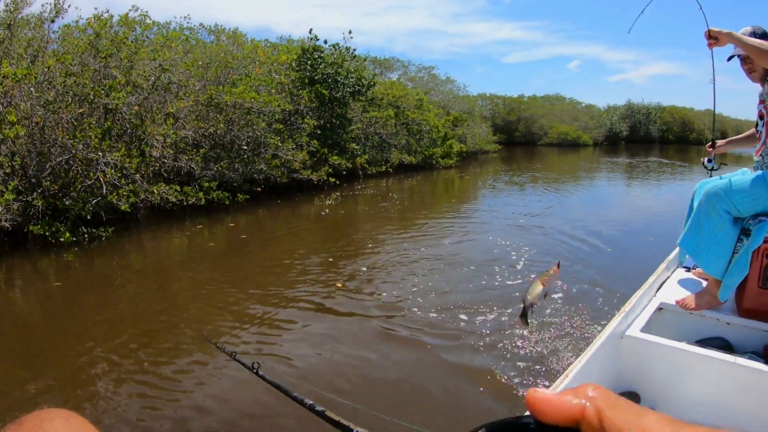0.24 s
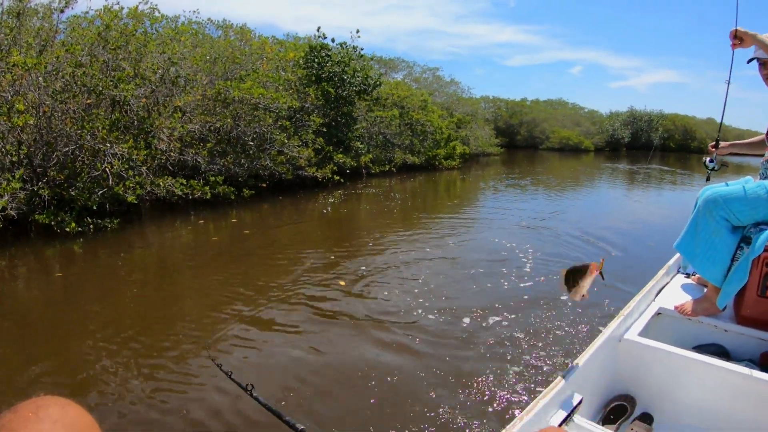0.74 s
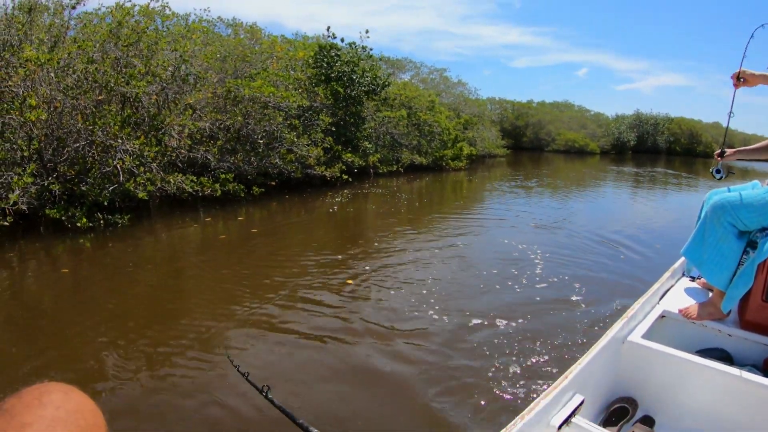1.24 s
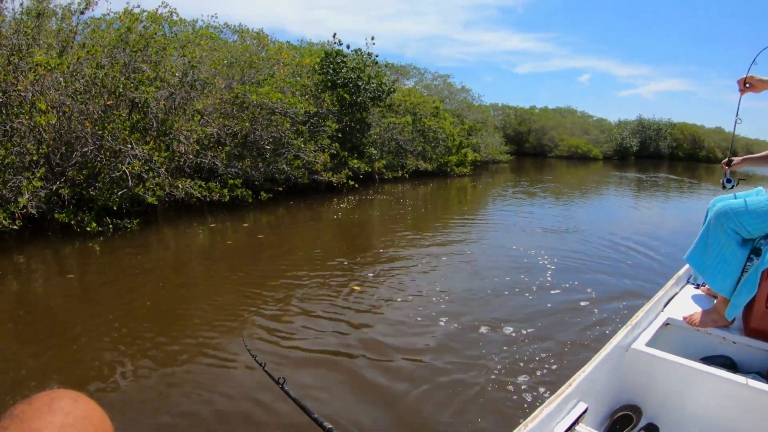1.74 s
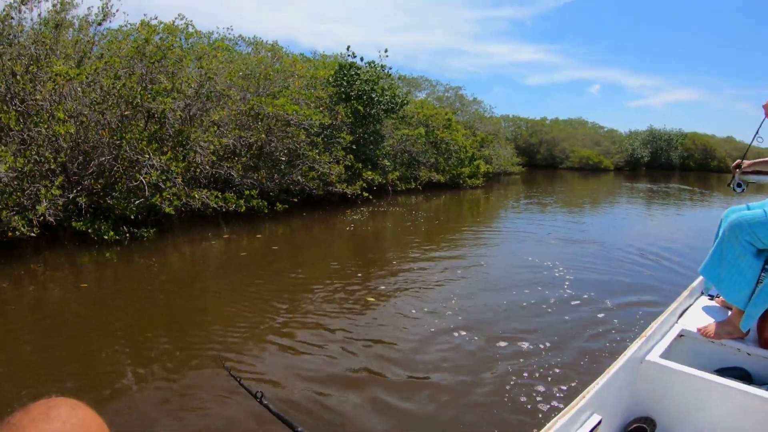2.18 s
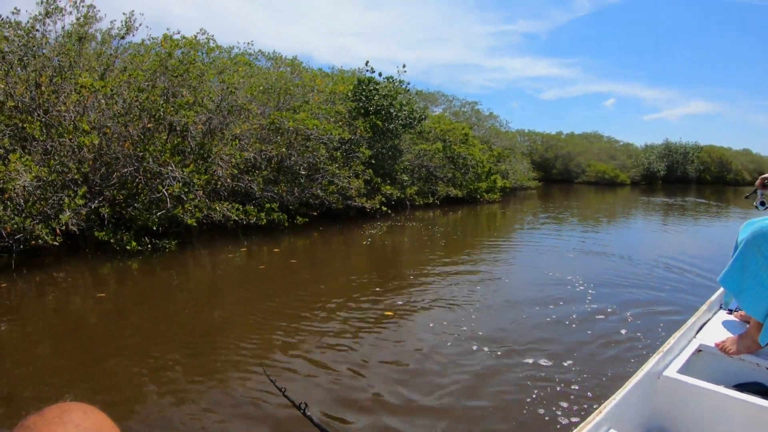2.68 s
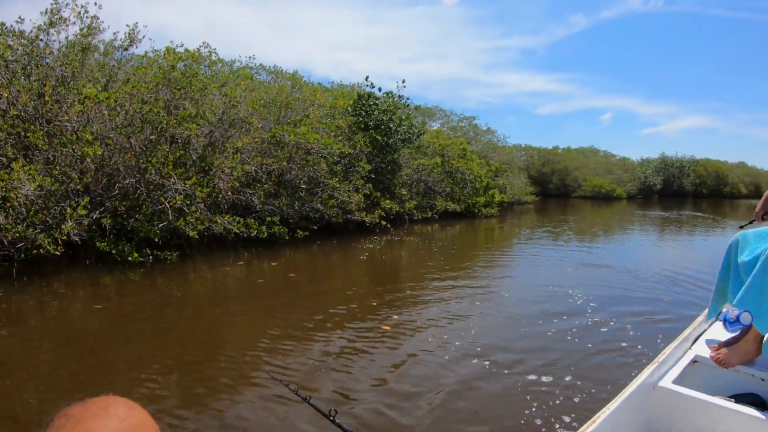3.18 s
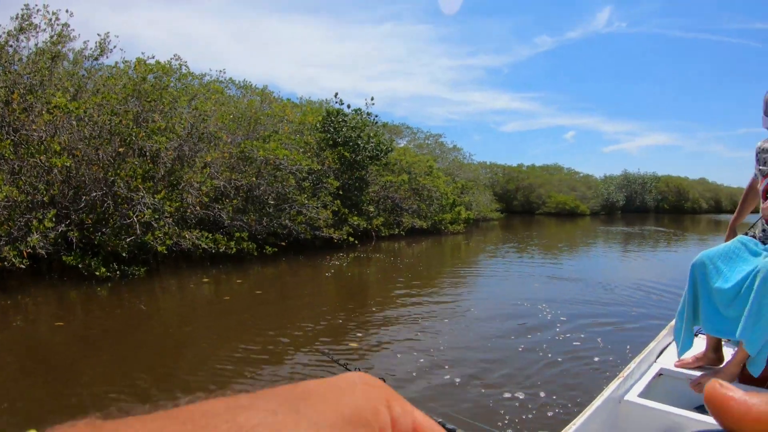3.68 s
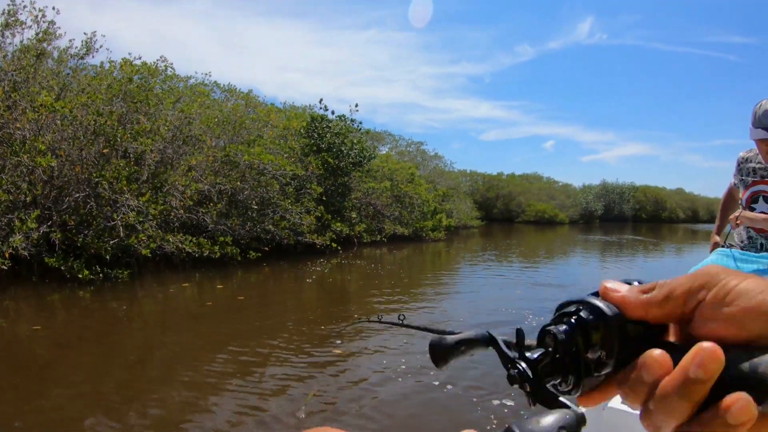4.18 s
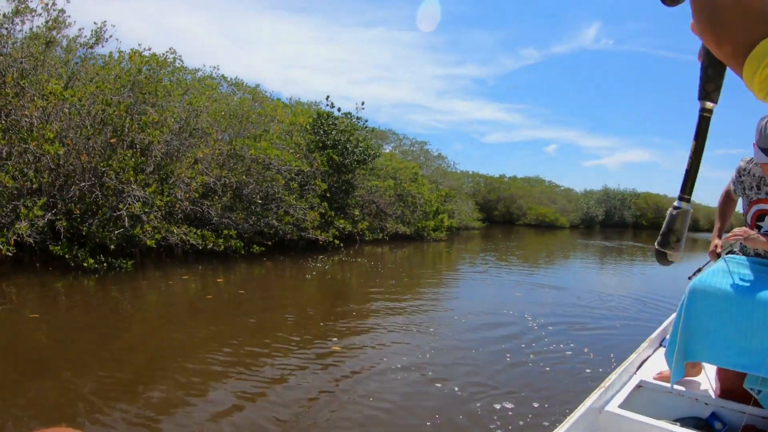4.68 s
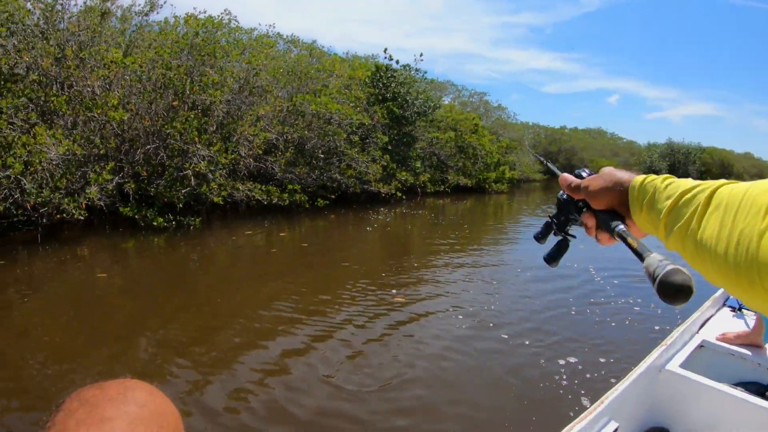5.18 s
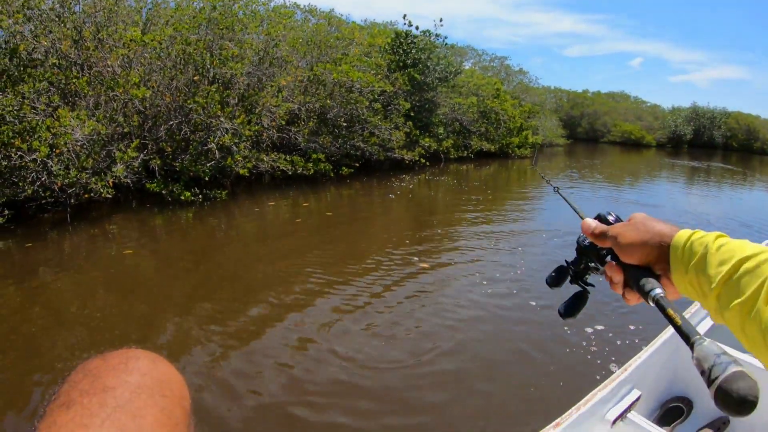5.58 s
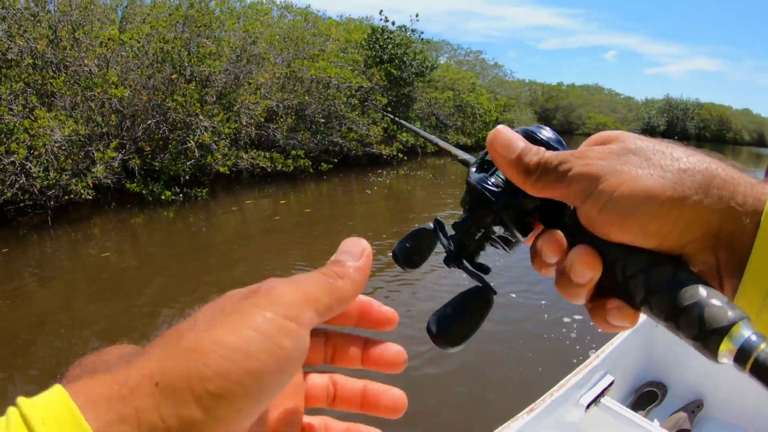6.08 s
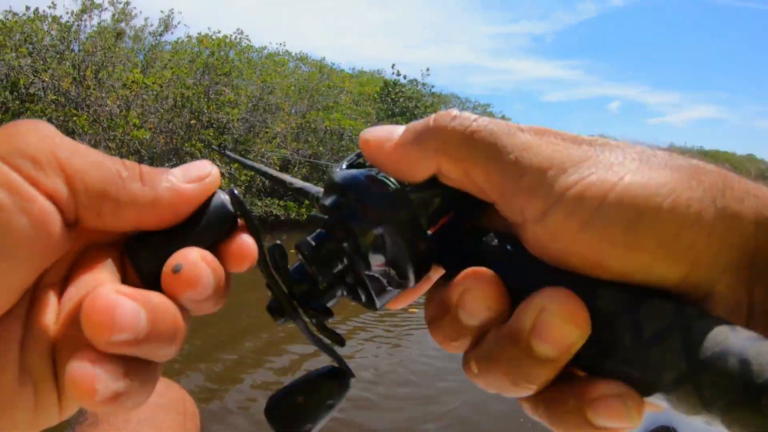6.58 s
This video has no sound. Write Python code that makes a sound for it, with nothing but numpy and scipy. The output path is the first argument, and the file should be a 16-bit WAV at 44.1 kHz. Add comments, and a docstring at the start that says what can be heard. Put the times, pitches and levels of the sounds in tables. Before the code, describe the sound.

Heard from inside a small boat on a river, light splashing and drips give way to a fish hitting the deck. Its flopping builds into loud hollow thumps, wet smacks and clanks, then dies down. A nearby reel snaps open, a rod sweeps the air, line whistles out faintly, and sharp clicks lead into a soft whirr of gears. Gentle water and a low rumbling hum continue throughout.

```python
"""A slosh and a patter of drops: a hooked fish leaves the river. It lands in a small boat and thrashes,
booming the hollow hull, slapping the deck with wet skin and jolting a loose fitting into a clank.
Close by, an angler frees a reel's spool, swishes the rod, lets the line whistle out and clicks the reel
back into gear. A low hum and rumble, lapping water and a soft outdoor hiss lie under it all."""
import sys
import numpy as np
from scipy import signal
from scipy.fft import rfft, irfft, next_fast_len
from scipy.io import wavfile
from scipy.ndimage import uniform_filter1d, map_coordinates

SR = 44100
rng = np.random.default_rng(int(sys.argv[2]) if len(sys.argv) > 2 else 0)


def dump(signal):
    """Clip the signal to [-1, 1] and save it as 16-bit WAV at the path in sys.argv[1]."""
    limited = np.clip(np.atleast_2d(signal).T, -1, 1)
    pcm = np.round(limited * 32767).astype(np.int16)
    wavfile.write(sys.argv[1], SR, pcm)


N = 301203
T = np.arange(N) / SR
AGE = T[:SR // 2]  # seconds since a contact


# The fish hits the hull. Each row: start in seconds, boom in dB, knock in dB, share of the free ring
# time, floor drum in dB.
BLOWS = [(1.108, -15.5, -30, 0.69, -33), (1.121, -24.5, -29.5, 0.74, -32), (1.222, -31.5, -50, 0.29, -66),
         (1.381, -39.5, -43, .69, -56), (2.665, -32, -51, 1, -39), (2.955, -7, -10.5, 0.71, -19.5),
         (2.964, -23, -36, 0.31, -33), (2.986, -17.5, -30, 0.61, -42), (3.256, -18, -22, 0.58, -21),
         (3.265, -18, -22.5, 0.99, -29), (3.645, -33, -38, 1, -32), (3.816, -30.5, -31, 0.96, -36.5),
         (3.942, -36.5, -41.5, .42, -40)]
# The hollow hull's modes. Each row: pitch in Hz, relative level in dB, t60 in seconds.
HULL_MODES = [(196.5, -3.5, 0.15), (255, -1, 0.15), (295, 1, .05), (456, -10, 0.047), (518.6, -1.5, 0.074),
              (637, -8.5, .13), (674.3, -8, 0.11), (690, -0.5, 0.025), (781, -12.5, 0.037),
              (996, -39, 0.11), (1158, -24.5, 0.089), (1361, -23.5, 0.064)]

def hull():
    """Hard blows ring the hull and drum its floor; the fish's weight damps them when it stays down."""
    out = np.zeros(N)
    drum_hz, drum_t60 = 109, 0.35
    for s, boom_db, knock_db, ring_share, drum_db in BLOWS:
        rise = 0.00097 * 2 ** (-knock_db / 28)  # the attack doubles for a knock 28 dB softer
        add(out, s, strike(HULL_MODES, 430, boom_db, knock_db, rise, ring_share))
        drum = np.sin(2 * np.pi * drum_hz * AGE) * fade(drum_t60 * ring_share, rise=0.011)
        add(out, s, amp(drum_db) * crest(drum))
    return out


# The soft body flops on the deck; hands and feet bump about.
# Each row: start in seconds, relative level in dB, panel pitch in Hz, attack in seconds.
THUDS = [(0.477, -43, 113, 0.0046), (1.074, -31.5, 257, 0.0025), (1.1, -19, 290, .005),
         (1.145, -24.5, 209, .0025), (1.193, -27.5, 255.6, 0.0033), (1.241, -36, 284, 0.0069),
         (1.317, -35, 253, 0.0022), (1.901, -24, 185, 0.0026), (2.672, -20, 179.5, 0.0076),
         (2.913, -16.5, 153, 0.01), (3.412, -20.5, 155, 0.015), (3.458, -25.5, 128.5, 0.0091),
         (3.539, -23, 160, 0.0021), (3.643, -15, 164.3, .0027), (3.668, -22, 153.5, 0.013),
         (3.793, -23, 136.7, 0.009), (3.827, -20, 132, 0.0025), (3.864, -28.5, 107, 0.0066),
         (3.937, -25, 149.4, .009), (3.968, -26.5, 132, 0.0097), (4.204, -42, 80, .005),
         (5.006, -25, 135, 0.0056), (5.796, -36, 97.6, 0.0088), (6.452, -32, 132, .017)]

def thuds():
    """A soft push moves one panel: a short low note in a dull puff."""
    out = np.zeros(N)
    for s, db, hz, rise in THUDS:
        panel = crest(np.sin(2 * np.pi * hz * AGE) * fade(0.13, rise))
        puff = spatter([(hz / 3, -18), (hz, 0), (hz * 2, -7), (hz * 6, -28)], 0.11, rise)
        add(out, s, amp(db - 5.5) * (panel + 0.28 * puff))
    return out


# Tail and fin slaps, and first a drip landing on the boat at 0.479 s. Each row: start in seconds, relative
# spray and smack levels in dB, t60 in seconds.
SLAPS = [(0.479, -52, -55.5, 0.22), (1.0558, -39, -40.5, 0.1), (1.1054, -33.5, -26, 0.11),
         (1.5975, -49, -45.5, 0.12), (1.7778, -39.5, -40.5, 0.1), (1.8948, -43.5, -49, 0.063),
         (2.2707, -37.5, -36, 0.11), (2.625, -49.5, -38, 0.3), (2.6632, -29.5, -28.5, 0.049),
         (2.8275, -38.5, -25.5, 0.065), (2.8641, -38, -26.5, 0.16), (2.9246, -40, -33, .2),
         (2.9514, -29, -22, 0.055), (2.9915, -45.5, -39, .11), (3.056, -45, -46, 0.078),
         (3.1205, -35.5, -32, 0.048), (3.259, -37.5, -28, .093), (3.3052, -49, -35, 0.062),
         (3.4228, -40, -36.5, 0.12), (3.4403, -43, -35, 0.035), (3.5269, -36, -37, 0.043),
         (3.649, -48, -36.5, .035), (3.789, -43.5, -41, .027), (3.816, -52, -34.5, 0.027)]
# Bright spray and fleshy smack. Each row: frequency in Hz, EQ gain in dB.
SPRAY_EQ = [(1650, -28), (2800, -12.5), (3230, -13.5), (4150, -2), (4720, -2.5), (6330, -3), (7800, -18),
            (8430, -17), (11100, -31.5), (12400, -19.5), (13100, -18.5), (15500, -29.5)]
SMACK_EQ = [(300, 2), (600, 2), (1300, -1.5), (2000, -9.5), (2900, -24.5), (4500, -40)]

def slaps():
    """Wet skin brushes the deck, then smacks it and throws fine spray; short slaps are the crispest."""
    out = np.zeros(N)
    brush_lead_s = 0.025
    for s, spray_db, smack_db, t60 in SLAPS:
        for eq, db in (SPRAY_EQ, spray_db - 6), (SMACK_EQ, smack_db - 6.5):
            add(out, s - brush_lead_s, amp(db - 15) * spatter(eq, t60=0.095, rise=0.02))
            add(out, s, amp(db) * spatter(eq, t60, rise=0.035 * t60))
    return out


# Jolts of a hollow fitting. Each row: start in seconds, relative clank and overtone levels in dB.
JOLTS = [(2.988, -50, -34.5), (3.058, -44, -44), (3.119, -19, -36.5), (3.311, -20, -34),
         (3.567, -37, -36.5), (3.654, -29.5, -44), (3.72, -29.5, -42), (3.774, -37, -42.5),
         (3.791, -31, -54), (3.824, -43, -62), (3.851, -39, -50.5), (4.168, -33.5, -44.5),
         (4.246, -36, -54)]
# The fitting's modes. Each row: pitch in Hz, relative level in dB, t60 in seconds.
FITTING_MODES = [(339, -1, 0.065), (440, -6.5, 0.046), (605, 1.5, 0.2), (658, 1.5, 0.045), (786, -15, .08),
                 (1019, -13, 0.18), (1110, -16, 0.12), (1208, -7.5, .11), (1348, -4.5, 0.07),
                 (1441, -4, 0.056), (1827, -20, 0.087), (2003, -14.5, 0.066), (2326, -18.5, .03)]

def fitting():
    """The loose fitting clanks, then sings on in its lowest long mode."""
    out = np.zeros(N)
    for s, db, overtone_db in JOLTS:
        add(out, s, strike(FITTING_MODES, 930, db - 7, overtone_db - 4, rise=0.0022))
    return out


# Skids on the deck. Each row: start and length in seconds, level and overtones in dB, chirp pitch in Hz.
SKIDS = [(2.812, .005, -34, -56.5, 735), (2.829, .016, -23, -37, 796), (2.862, .051, -23, -32.5, 715)]
# The deck's modes. Each row: pitch in Hz, relative level in dB, t60 in seconds.
DECK_MODES = [(257, -21.5, 0.22), (628, -10, 0.079), (700, -8, 0.027), (758, -5.5, 0.059),
              (1136, -16.5, 0.12), (1309, -7.5, 0.054), (1438, -7, 0.029), (1824, -18, 0.043),
              (2426, -24, 0.04)]

def skids():
    """Stick and slip: each jerk chirps and rings the deck, weaker and lower as the skid slows."""
    out = np.zeros(N)
    jerk_gap_s, fade_db_per_s, sag_hz_per_s = 0.0115, 198, 1700
    for s, length, db, overtone_db, hz in SKIDS:
        for age in np.arange(0, length, jerk_gap_s):
            loss_db = fade_db_per_s * age
            chirp = (hz - sag_hz_per_s * age, 3, 0.022)
            jerk = strike([chirp] + DECK_MODES, 1000, db - loss_db, overtone_db - loss_db / 2, rise=0.0035)
            add(out, s + age * (1 + 0.06 * rng.standard_normal()), jerk)
    return out


# The body slides between flops. Each row: peak time in seconds, level in dB.
SLIDES = [(2.68, -32), (3.02, -37.5), (3.33, -39), (3.451, -36), (3.569, -36.5), (3.84, -35.5)]
# A dull rub. Each row: frequency in Hz, EQ gain in dB.
RUB_EQ = [(30, 5.5), (70, 5), (150, 9.5), (330, 4.5), (480, -14), (680, 1.5), (950, -37.5), (1400, -18.5),
          (2200, -35.5), (3000, -61)]

def slides():
    """The wet body rubs along the deck in fits."""
    sliding = sum(amp(db) * swell(s, 236, 259.5) for s, db in SLIDES)
    return sliding * amp(3.3 * wobble(90)) * noise(RUB_EQ)


# Upper-mid sizzle, shared with the outdoor hiss. Each row: frequency in Hz, EQ gain in dB.
SIZZLE_EQ = [(1500, 0), (2300, -4), (3000, -5.5), (3700, -4), (5000, -19)]

def squelch(start_s=2.2, length_s=1.0, ticks=32):
    """Wet skin peels off the deck in tiny ticks as the fish begins to writhe."""
    out = np.zeros(N)
    for when, softness in rng.random((ticks, 2)):
        tick = spatter(SIZZLE_EQ, t60=0.022, rise=0.0006)
        add(out, start_s + length_s * when ** 0.7, amp(-60.5 - 12 * softness) * tick)
    return out


# The loudest drops on the river. Each row: start in seconds, relative level in dB, bubble pitch in Hz.
DROPS = [(0.003, -44, 415), (0.045, -46, 810), (0.064, -43.5, 637), (0.097, -42.5, 630),
         (0.334, -43.5, 647), (0.345, -41.5, 590), (1.056, -38, 727), (1.555, -53, 1430), (5.434, -52, 605),
         (6.043, -49.5, 396)]

def drops(laps_per_s=3.7, lap_hz=693):
    """Each drop traps a bubble that rises in pitch inside a little splash; faint laps come at random."""
    out = np.zeros(N)
    laps = [(when * N / SR, -58.5 + 8 * (size - 0.5), lap_hz * 2 ** (1.6 * (pitch - 0.5)))
            for when, size, pitch in rng.random((int(laps_per_s * N / SR), 3))]
    for s, db, hz in DROPS + laps:
        bubble = np.sin(2 * np.pi * hz * AGE * (1 + 0.58 * AGE)) * fade(t60=0.054, rise=0.00074)
        splash = spatter(SMACK_EQ, t60=0.13, rise=0.003)
        add(out, s, amp(db - 3.5) * (crest(bubble) + 0.2 * splash))
    return out


# Moving water, shared with the river's wash. Each row: frequency in Hz, EQ gain in dB.
WATER_EQ = [(160, -32.5), (290, 1.5), (480, -4.5), (630, 0), (980, -12), (1200, -5.5), (1450, -8.5),
            (1700, -16.5), (2500, -23.5), (3250, -51.5)]

def slosh():
    """The river churns shut over the spot where the fish left it."""
    churn = amp(4.1 * wobble(71.4)) * patchy(noise(WATER_EQ), depth_db=0.5)
    return amp(-54.5) * swell(0.06, 30, 66) * churn


# The crack of a tiny contact, shared with the reel. Each row: frequency in Hz, EQ gain in dB.
CRACK_EQ = [(1500, -5), (3000, -3.5), (4500, -0.5), (6300, 2), (7500, -5.5), (10800, -24), (12400, -16),
            (15500, -26)]

def drips(length_s=1.0, count=20):
    """Fine drips tick on the boat, thinning out while the fish hangs in the air."""
    out = np.zeros(N)
    for when, softness in rng.random((count, 2)):
        tick = spatter(CRACK_EQ, t60=0.02, rise=0.0006)
        add(out, length_s * when ** 1.7, amp(-55.5 - 12.5 * softness) * tick)
    return out


# Thumb bar and clutch. Each row: start in seconds, then ring, housing and crack levels in dB.
CLICKS = [(4.095, -58, -53, -72), (4.133, -51, -65, -75), (4.1448, -32, -42, -44), (4.151, -62, -51, -57),
          (4.25, -49, -62, -55.5), (4.254, -55, -68, -65), (4.27, -61, -75, -61), (4.498, -64, -65, -65),
          (5.622, -58, -76, -79), (6.39, -62, -55, -68), (6.495, -58, -47, -42.5),
          (6.5141, -36.5, -46, -36), (6.535, -39.5, -36.5, -38.5)]
# Modes of the housing and spool. Each row: pitch in Hz, relative level in dB, t60 in seconds.
REEL_MODES = [(321, -4, 0.031), (647, 2, 0.02), (1160, -5, 0.021), (1546, -4, 0.016), (2560, -5.5, 0.018),
              (4190, -4, 0.024), (4640, -7, .022), (5120, -0.5, 0.017), (5770, -2.5, 0.033),
              (6200, -4.5, .025), (6530, -7.5, 0.014)]

def reel_clicks():
    """The clutch snaps against the housing: a sharp crack and a small, bright ring."""
    out = np.zeros(N)
    for s, ring_db, housing_db, crack_db in CLICKS:
        add(out, s, strike(REEL_MODES, 3200, housing_db, ring_db, rise=0.0012))
        add(out, s, amp(crack_db) * spatter(CRACK_EQ, t60=0.026, rise=0.001))
    return out


# The rod's two strokes. Each row: moment of top speed in seconds, rush in dB, hiss in dB.
STROKES = [(4.9, -41, -59), (5.04, -41, -64.5)]
# Low rush and airy top, the top shared with the outdoor hiss. Each row: frequency in Hz, EQ gain in dB.
SWISH_EQ = [(35, -14), (70, 0), (140, 0), (270, -6), (500, -6), (680, -9.5), (950, -23.5), (1300, -18),
            (2000, -24.5), (2800, -42), (3500, -58)]
HISS_EQ = [(3000, -17), (3700, -11), (4200, 1), (5100, -1), (6300, -0.5), (7100, -12), (8500, -15.5),
           (9800, -24.5), (11200, -31.5), (12400, -18.5), (13500, -19.5), (15700, -38)]

def rod_swing(stop_s=5.076):
    """The rod sweeps the air back and forward, and shudders as it is checked."""
    out = np.zeros(N)
    for s, rush_db, hiss_db in STROKES:
        air = amp(rush_db + 3.3 * wobble(60)) * noise(SWISH_EQ) + amp(hiss_db) * noise(HISS_EQ)
        out += swell(s, 210, 78.5) * air
    add(out, stop_s, amp(-31) * spatter(SWISH_EQ, t60=0.1, rise=0.0021))
    return out


# Line running through the guides. Each row: frequency in Hz, EQ gain in dB.
RUSTLE_EQ = [(2000, -11.5), (4000, -1.5), (6000, 3), (8400, -5.5), (9300, -16.5), (11000, -21),
             (12600, -11.5), (15500, -21)]

def spool(release_s=4.992, brake_s=5.76):
    """The spool spins up and coasts, whistling as line rustles out, until the thumb brushes it still."""
    drag_free_hz, spin_up_s, coast_s = 19800, 0.088, 0.68
    age = np.maximum(T - release_s, 0)
    hz = drag_free_hz * (1 - np.exp(-age / spin_up_s)) * np.exp(-age / coast_s)
    colour_db = np.interp(hz, *np.transpose(RUSTLE_EQ))
    pull_db = 23 * np.exp(-age / 0.075)  # louder while the lure pulls the spool up to speed
    whistle = amp(-78.5 + colour_db + pull_db) * whine(hz, width_hz=2600)
    rustle = amp(2.4 * wobble(160)) * noise(RUSTLE_EQ)
    running = np.clip(age / 0.038, 0, 1) * swell(brake_s, 0, 200)
    thumb = amp(-58.5) * swell(brake_s, 490, 183) * rustle
    return running * (whistle + amp(-73.5) * rustle) + thumb


# Tackle taps as the rod is raised. Each row: start in seconds, level in dB, pitch in Hz.
TAPS = [(4.097, -52.5, 1660), (4.322, -60, 1690), (4.503, -53.5, 1445), (4.572, -51, 1264),
        (4.61, -54.5, 1425), (4.648, -52, 1380), (4.72, -62, 1400)]

def tackle_taps():
    """Each light tap is a brief pip with a weaker overtone and a faint low ring."""
    out = np.zeros(N)
    for s, db, hz in TAPS:
        modes = [(600, 0, 0.1), (hz, 0, 0.06), (hz * 1.35, -7, 0.04)]
        add(out, s, strike(modes, 930, db - 8.5, db, rise=0.002))
    return out


# The gears' noise and their tones. Each row: frequency in Hz, relative level in dB.
GEAR_EQ = [(400, -14), (800, 7), (1250, 1), (2000, -2), (3000, -1), (4200, 6), (5700, -6), (7000, -19),
           (9000, -27), (11000, -29), (14000, -32)]
GEAR_TONES = [(1250, -2), (5500, -7.5), (9000, -26)]

def gears(start_s=6.53, rise_s=0.016):
    """The handle turns the reel's gears in a soft, fluttering whirr."""
    whirr = noise(GEAR_EQ) + sum(amp(db) * whine(hz, width_hz=150) for hz, db in GEAR_TONES)
    turning = np.clip((T - start_s) / rise_s, 0, 1)
    return turning * amp(-65.5 + 2.4 * wobble(80)) * whirr


def river():
    """A steady wash of water, lapping in slow swells and quick ripples."""
    lapping = amp(1.2 * wobble(4) + 2.4 * wobble(25))
    return amp(-64.5) * lapping * patchy(noise(WATER_EQ), depth_db=3.0)


# The low bed: hum harmonics and rumble colour. Each row: frequency in Hz, relative level in dB.
HUM_TONES = [(61.7, -60.5), (123.4, -60), (185, -55)]
RUMBLE_EQ = [(20, -15), (45, -2), (90, -8), (160, 9), (215, 0), (280, -13), (450, -41)]

def low_bed():
    """Three harmonics hum and waver in an uneven rumble."""
    hum = np.zeros(N)
    for hz, db in HUM_TONES:
        level = np.sqrt(2) * amp(db - 0.5 + 2.04 * wobble(9))
        hum += level * np.sin(2 * np.pi * hz * T + 0.5 * wobble(9))
    return hum + amp(-54.5 + 3.9 * wobble(8.8)) * noise(RUMBLE_EQ)


# Fader moves for the treble. Each row: time in seconds, relative hiss and sizzle levels in dB.
TREBLE_FADERS = [(0.0, -65.5, -75), (0.38, -67, -71), (0.61, -68, -76.5), (1.65, -71, -74.5),
                 (1.94, -68, -74), (2.55, -64.5, -68), (2.79, -62, -69), (3.02, -65.5, -72),
                 (3.27, -74.5, -75.5), (3.69, -66, -77), (3.88, -72, -79), (4.43, -73.5, -93),
                 (4.87, -77.5, -81.5), (5.02, -70, -83), (5.97, -73, -83), (6.54, -67.5, -70.5),
                 (6.66, -72, -73), (6.83, -70, -73)]

def outdoor_hiss():
    """Two bands of soft noise drift in level and crackle finely together."""
    times, *faders = np.transpose(TREBLE_FADERS)
    hiss_db, sizzle_db = (np.interp(T, times, fader) for fader in faders)
    sizzle = amp(sizzle_db + 0.5 + 2.8 * wobble(14)) * noise(SIZZLE_EQ)
    hiss = amp(hiss_db - 0.5) * patchy(noise(HISS_EQ), depth_db=1.5)
    crackle = amp(1.5 * wobble(12) + 2.3 * wobble(400))
    return (sizzle + hiss) * crackle


def strike(modes, split_hz, low_db, high_db, rise, ring_share=1):
    """Ring a body at random mode strengths; modes below and above split_hz get separate levels."""
    low, high = np.zeros((2, len(AGE)))
    for (hz, db, t60), (size, detune) in zip(modes, rng.standard_normal((len(modes), 2))):
        # broad, quickly dying modes shift with the point of contact
        cycles = hz * AGE + 0.25 * detune * AGE / t60
        band = low if hz < split_hz else high
        band += amp(db + 2 * size) * np.sin(2 * np.pi * cycles) * fade(t60 * ring_share, rise)
    return amp(low_db) * crest(low) + amp(high_db) * crest(high)


def spatter(eq, t60, rise):
    """A burst of noise that breaks into millisecond droplets."""
    clumps_db = 3 * wobble(500, size=len(AGE))
    return crest(noise(eq, size=len(AGE)) * amp(clumps_db) * fade(t60, rise))


def whine(hz, width_hz):
    """A fuzzy tone of rms 1."""
    phase = 2 * np.pi * np.cumsum(hz * np.ones(N)) / SR
    return unit(np.sin(phase) * wobble(width_hz))


def noise(eq, size=N):
    """Noise of rms 1 coloured by (Hz, dB) points, silent beyond them."""
    padded = next_fast_len(size)
    hz, db = np.transpose(eq)
    log_bins = np.log(np.fft.rfftfreq(padded, 1 / SR) + 1)
    gain = amp(np.interp(log_bins, np.log(hz), db, left=-120, right=-120))
    return unit(irfft(rfft(rng.standard_normal(padded)) * gain, padded)[:size])


def patchy(x, depth_db):
    """Let narrow bands of a noise swell and sink on their own."""
    bands = signal.stft(x, nperseg=512)[2]
    patches = uniform_filter1d(rng.standard_normal(bands.shape), size=6, axis=0)
    patches = uniform_filter1d(patches, size=10, axis=1)
    return unit(signal.istft(bands * amp(depth_db * unit(patches)), nperseg=512)[1][:N])


def wobble(rate, size=N):
    """A smooth random curve, rate knots a second."""
    return map_coordinates(rng.standard_normal(int(size * rate / SR) + 4), [T[:size] * rate])


def fade(t60, rise):
    """Envelope of a contact: a quick attack, then 60 dB of decay every t60 seconds."""
    return np.exp(-np.log(1000) * AGE / t60) * (1 - np.exp(-(AGE / rise) ** 2))


def swell(s, rise_db_per_s, fall_db_per_s):
    """Envelope of a stroke that grows up to time s and then dies away."""
    return amp(-np.maximum(rise_db_per_s * (s - T), fall_db_per_s * (T - s)))


def amp(db):
    """Decibels to gain."""
    return 10 ** (np.asarray(db) / 20)


def unit(x):
    """Scale to rms 1."""
    return x / np.sqrt(np.mean(x ** 2) + 1e-20)


def crest(x):
    """Scale a hit so that its loudest 4 ms have rms 1."""
    return x / np.sqrt(uniform_filter1d(x ** 2, 176).max() + 1e-20)


def add(track, s, sound):
    """Mix a sound into the track at time s."""
    room = track[max(round(s * SR), 0):][:len(sound)]
    room += sound[:len(room)]


def scene():
    """Everything heard from the boat, in mono."""
    lift = slosh() + drops() + drips()
    thrashing = hull() + thuds() + skids() + fitting() + slaps() + slides() + squelch()
    angler = tackle_taps() + reel_clicks() + gears() + rod_swing() + spool()
    ambience = low_bed() + river() + outdoor_hiss()
    return (lift + thrashing + angler + ambience)[None]


def record(dry):
    """A brick-wall low-pass trims the very top of the mix."""
    top_hz = 15750
    padded = next_fast_len(N + SR // 2)
    passband = np.fft.rfftfreq(padded, 1 / SR) < top_hz
    return irfft(rfft(dry, padded) * passband, padded)[..., :N]


dry = scene()
out = record(dry)
dump(out)
```